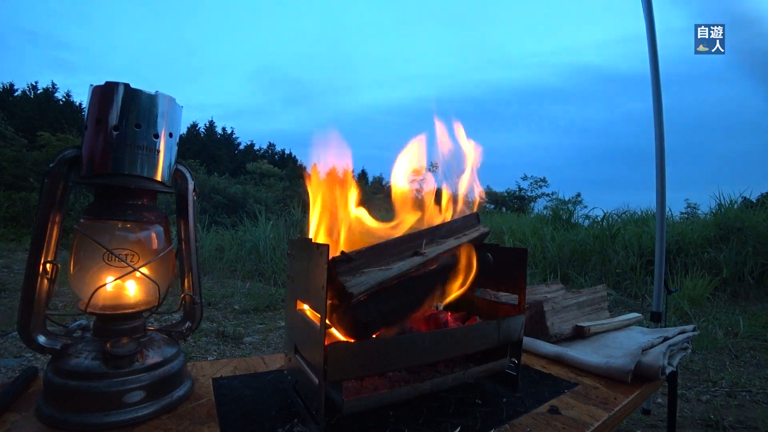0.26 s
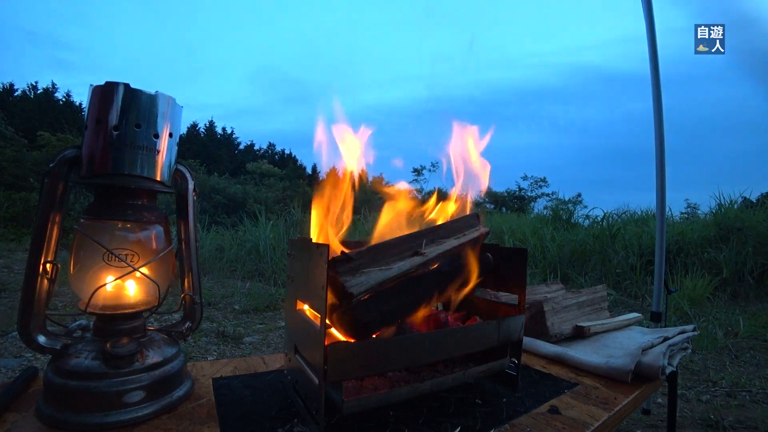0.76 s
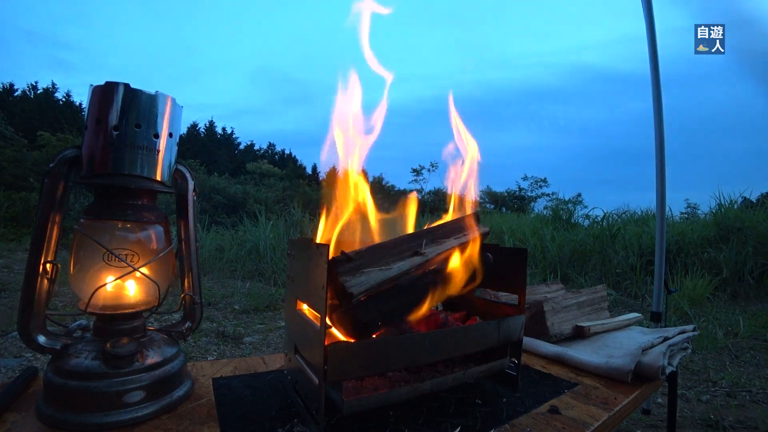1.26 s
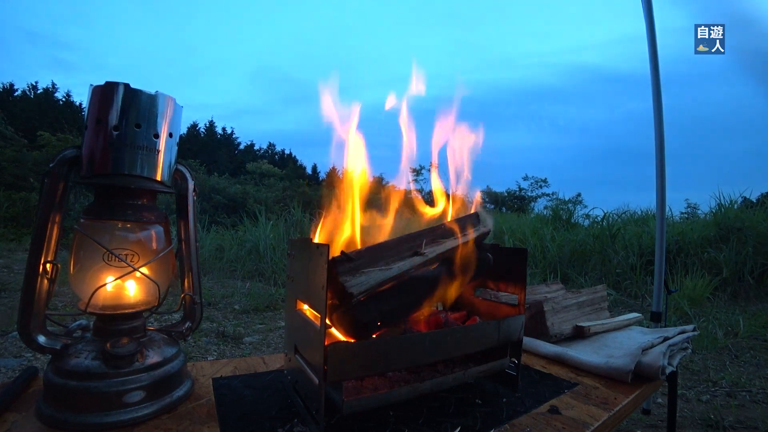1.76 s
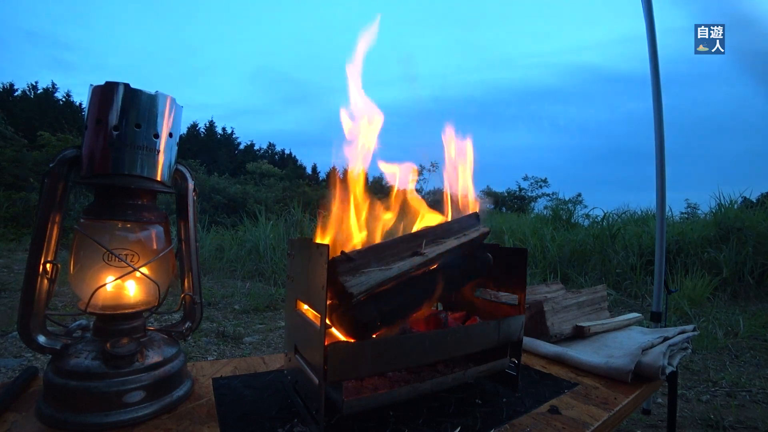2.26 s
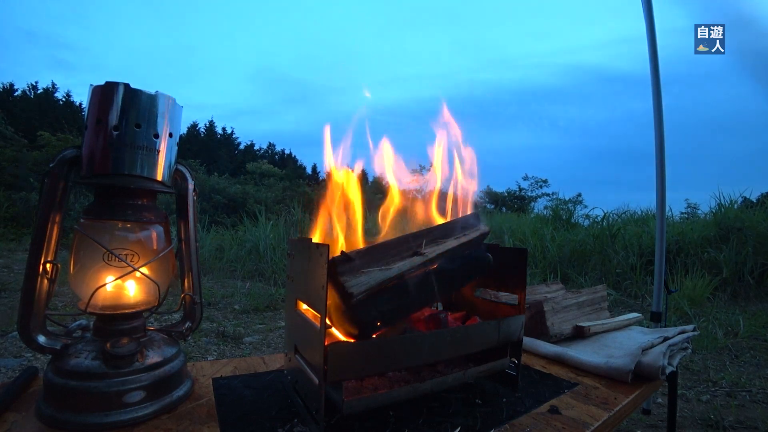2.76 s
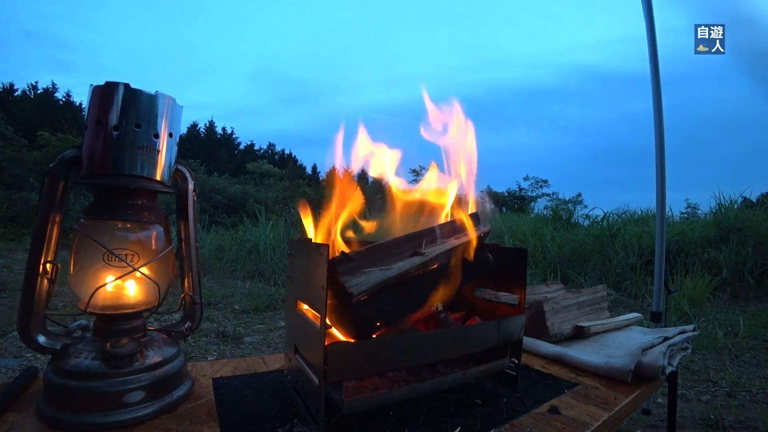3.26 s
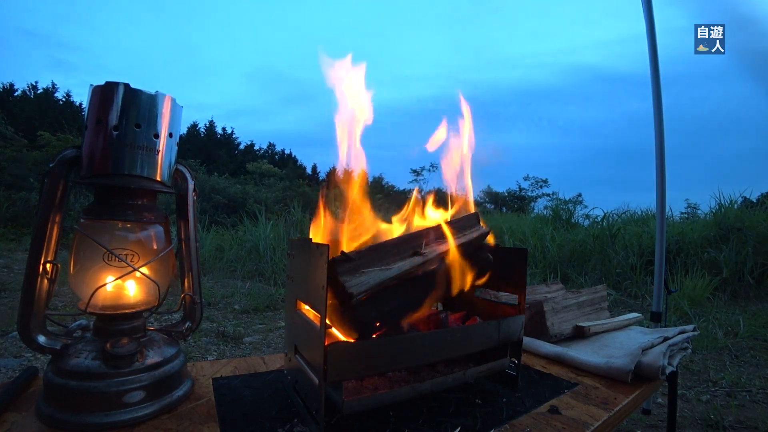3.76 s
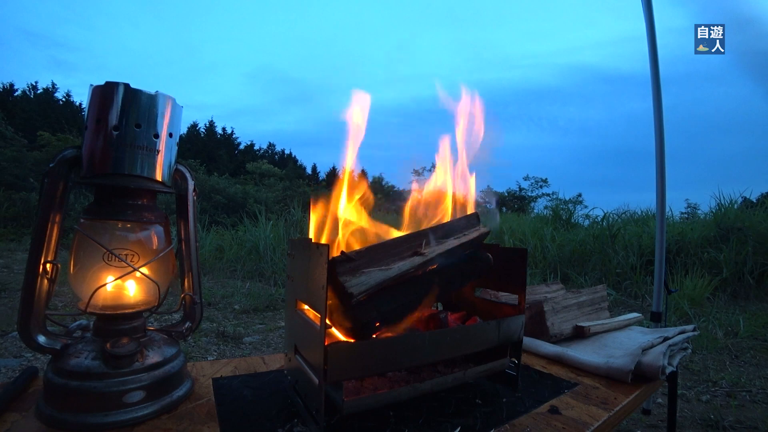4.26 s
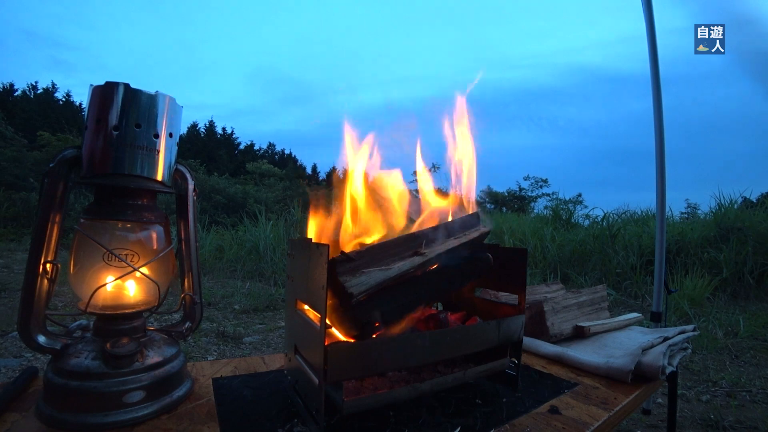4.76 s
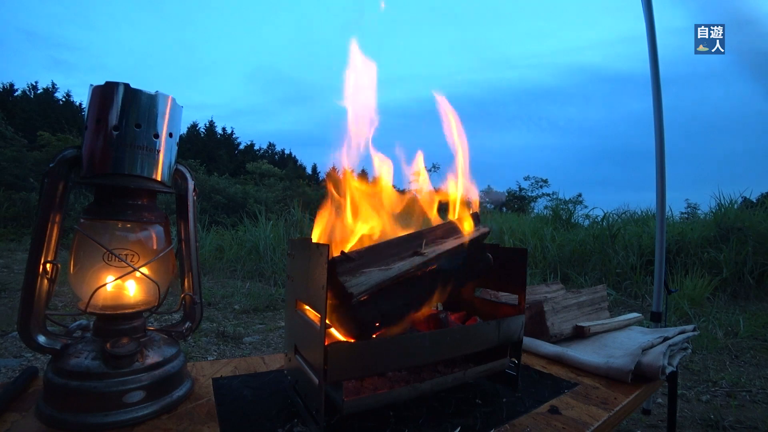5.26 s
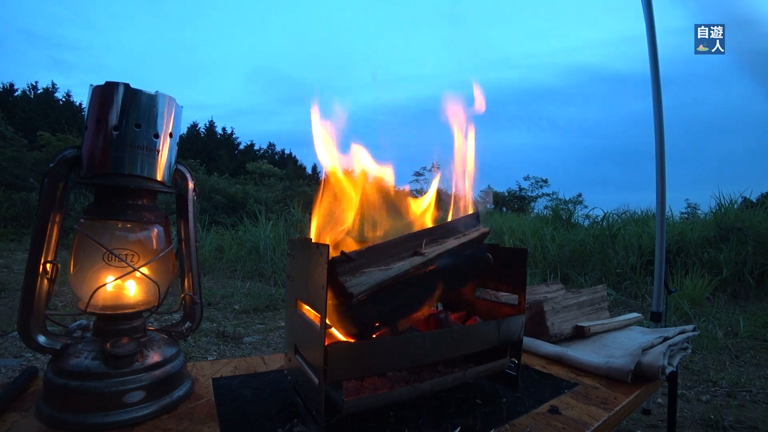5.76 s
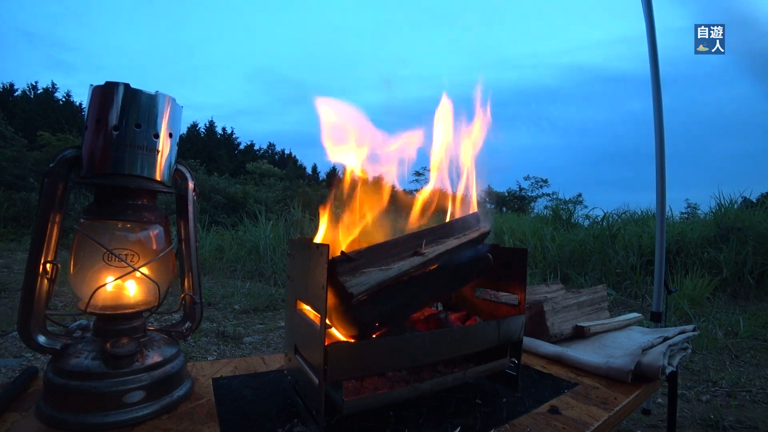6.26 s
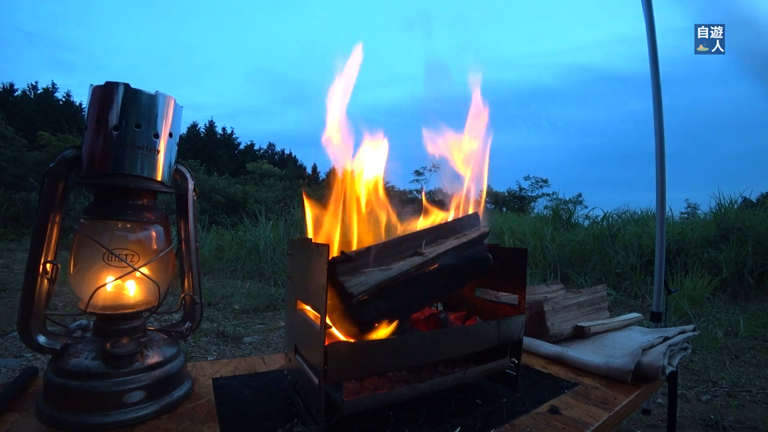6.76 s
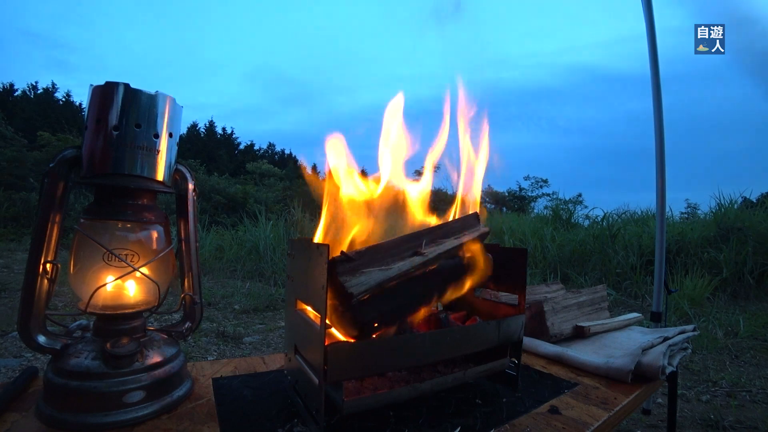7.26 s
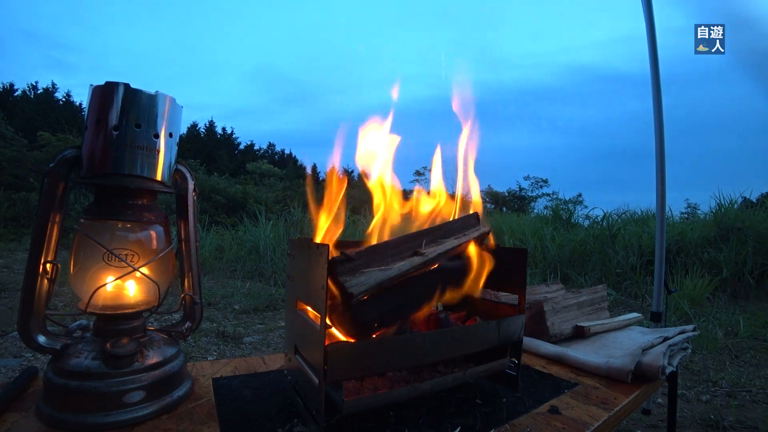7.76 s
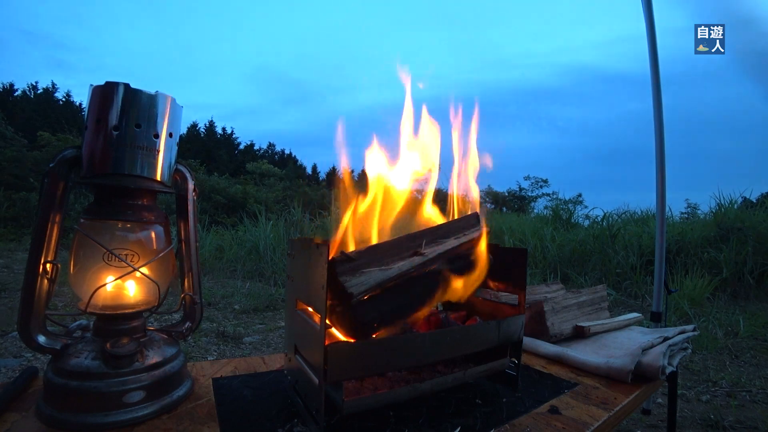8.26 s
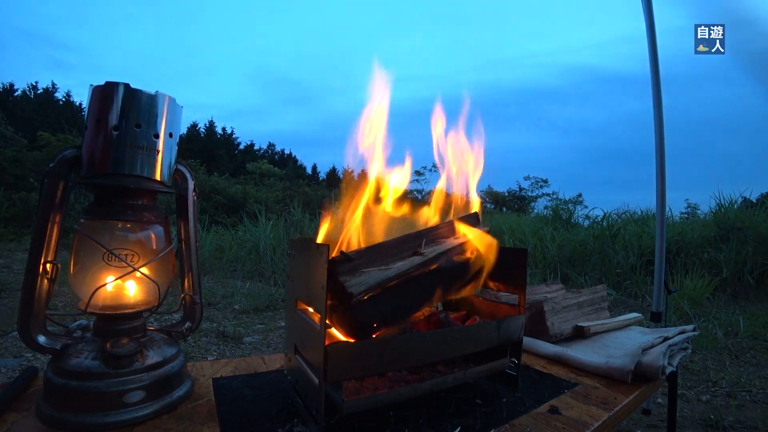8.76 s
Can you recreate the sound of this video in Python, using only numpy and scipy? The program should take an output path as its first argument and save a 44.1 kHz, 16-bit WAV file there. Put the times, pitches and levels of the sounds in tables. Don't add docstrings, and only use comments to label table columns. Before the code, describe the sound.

A small wood fire burns close to a wide stereo microphone outdoors at dusk. Soft, low flame puffs patter constantly, broken by dry, irregular snaps and a few sharp pops. Cicadas buzz in rapid pulses from the trees, gradually tiring; two new ones swell up near the end. Behind them lie a distant throbbing chorus, a thin high cricket, broad airy hiss and faint breeze rumble.

```python
import sys
import numpy as np
from scipy import signal
from scipy.fft import rfft, irfft
from scipy.io import wavfile

SR = 44100
rng = np.random.default_rng(int(sys.argv[2]) if len(sys.argv) > 2 else 0)


def invert_db(level):
    return 10 ** (np.asarray(level, dtype=float) / 20)


def materialize(psi):
    bounded = np.clip(np.atleast_2d(psi).T, -1, 1)
    quanta = np.round(bounded * 32767).astype(np.int16)
    wavfile.write(sys.argv[1], SR, quanta)


N = 396900
TIME = np.arange(N) / SR

# (time [s], level [dB])
SONG_A = [(0.1, -7), (.3, -4.5), (1.4, -4), (2.0, -3), (3.0, -1.5), (3.6, -3.5), (3.8, -5.5), (4.86, -4),
          (5.55, -6)]
SONG_B = [(0.2, 2), (.75, -1), (1.31, 1.2), (1.46, -5), (2.3, 1.5), (2.9, -5), (3.3, -2.5), (4.5, -13.5),
          (4.97, .5), (5.31, -5.5)]
SONG_C = [(0.1, -2), (.8, -5.5), (1.2, -2.5), (1.6, -4.5), (1.9, -6.5), (2.8, -4.5), (4.1, -4.5), (5.2, -6),
          (6.2, -4), (7.0, -6.5)]
SONG_D = [(6.9, -21), (7.19, -10.5), (7.34, -8.5), (7.63, -10.5), (7.79, -6.5), (7.93, -3), (8.68, 0.6),
          (8.99, 1)]
SONG_E = [(7.48, -5.5), (7.76, -6), (8.1, -2), (8.31, -2), (8.5, -1.5), (8.9, -1)]
# (time [s], rate [Hz])
RATE_A = [(0, 305.6), (2, 304), (3.2, 302.8), (4.3, 300.3), (5.5, 296)]
RATE_B = [(.2, 293), (1.3, 290.5), (2.8, 289), (5.5, 287.4)]
RATE_C = [(0, 282.3), (1, 281), (3.5, 281), (5, 279.3), (7, 276.2)]
RATE_D = [(6.9, 289.4), (7.2, 291), (7.35, 296), (7.78, 298.6), (8.07, 301.3), (8.22, 303.4), (9, 303.4)]
RATE_E = [(7.48, 296.5), (7.85, 298.3), (8.2, 297.4), (8.9, 296.3)]
# (syllables sung so far [count], time [s])
PACE_A = [(0, -.016), (26, 3.905), (30, 4.528), (32, 4.862), (36, 5.552)]
PACE_B = [(0, -.008), (4, .566), (10, 1.455), (20, 2.957), (26, 3.886), (30, 4.495), (35, 5.305)]
PACE_C = [(0, .012), (19, 3.03), (31, 4.97), (43, 6.985)]
PACE_D = [(0, 6.903), (3, 7.338), (9, 8.222), (12, 8.675), (14, 8.986)]
PACE_E = [(0, 7.478), (6, 8.312), (10, 8.895)]


def curve(rows):
    return np.interp(TIME, *np.transpose(rows))


def coloured(gain):
    hz = np.arange(N // 2 + 1) * SR / N
    spectrum = rfft(rng.standard_normal(N)) * gain(hz + 1e-3)
    return irfft(spectrum, N) * np.sqrt(SR / 2)


def hiss(spectrum_rows):
    hz, db = np.transpose(spectrum_rows)
    return coloured(lambda f: invert_db(np.interp(np.log(f), np.log(hz), db)))


def hump(hz, width_hz):
    x = coloured(lambda f: np.exp(-((f - hz) / width_hz) ** 2))
    return x / x.std()


def walk(rate_hz, t=TIME):
    return 1.2 * np.interp(t * rate_hz, np.arange(1000), rng.standard_normal(1000))


def add(out, start_s, grain):
    i = int(start_s * SR)
    out[..., i:i + grain.shape[-1]] += grain[..., :max(N - i, 0)]


def puffs():
    # (time [s], pitch [Hz], peak [dB])
    clear_pockets = [(.0544, 650, -36), (.5146, 630, -43), (.6058, 630, -43), (1.4251, 500, -40),
                     (1.9793, 484, -41), (2.6292, 650, -35), (2.9399, 497, -41.5), (2.9891, 630, -40),
                     (3.0727, 633, -39), (3.1832, 650, -35.5), (3.2043, 685, -35.5), (3.2803, 500, -38.5),
                     (3.6167, 510, -42), (3.9101, 630, -43), (4.326, 670, -37.5), (4.4198, 506, -41),
                     (5.0336, 630, -40), (5.1531, 500, -39.5), (5.1912, 503, -40), (5.4621, 500, -39),
                     (5.5955, 500, -37.5), (6.3395, 500, -39.5), (6.5065, 500, -39), (6.9562, 630, -35),
                     (7.1465, 530, -36.5), (7.3987, 510, -38), (8.6024, 500, -40), (8.7223, 495, -39),
                     (8.7991, 630, -40), (8.9804, 500, -39)]
    # (time [s], pitch [Hz], peak [dB])
    deep_pockets = [(.1595, 250, -45), (.3076, 397, -42.5), (.578, 324, -40), (.7624, 450, -43.5),
                    (1.5861, 404, -40.5), (1.9245, 332, -39.5), (2.1978, 396, -40.5), (2.2773, 410, -38),
                    (2.2946, 327, -43), (2.4492, 320, -41.5), (2.4866, 247, -42), (2.8496, 397, -41),
                    (3.4495, 320, -46), (3.8611, 400, -43), (4.1403, 313, -44), (4.442, 316, -41),
                    (4.5194, 390, -35), (4.7109, 250, -44), (4.9098, 410, -42.5), (5.579, 400, -42),
                    (5.9713, 400, -46), (6.0493, 252, -42.5), (6.3587, 400, -42), (6.7806, 320, -43.5),
                    (6.9687, 388, -37.5), (6.9747, 400, -39.5), (7.1789, 312, -40), (8.5332, 258, -37.5),
                    (8.6407, 450, -46), (8.9649, 420, -42)]
    # (time [s], peak [dB])
    soft_pockets = [(.0828, -44), (.6978, -45), (1.3746, -47), (1.7261, -45), (1.7722, -42), (1.8679, -45),
                    (2.2347, -44), (2.5182, -43.5), (2.6354, -45), (3.0785, -42), (3.1489, -44),
                    (3.2657, -44), (3.3776, -43), (3.5564, -47), (3.7548, -45), (4.8042, -43), (4.954, -43),
                    (5.063, -43), (5.4682, -41), (5.6804, -43.5), (5.737, -46), (6.316, -43),
                    (6.8871, -41.5), (8.253, -46.5), (8.2822, -49), (8.4735, -47), (8.521, -43),
                    (8.5398, -45), (8.5937, -40.5), (8.7299, -41)]
    # (time [s], level of the weak patter [dB])
    flame_level = [(0, 0), (1.0, -0.5), (1.3, -0.5), (2.5, 0.5), (4.1, -0.5), (5.2, 1.5), (6.6, -1.5),
                   (7.3, -1.5), (7.5, -5.5), (8.15, -1.5), (8.5, 2), (9, 4.5)]

    chance = rng.random((1200, 3))
    start_s = np.repeat(rng.random(600), 2) * (N / SR - .05) + .03 * chance[:, 0]
    pitch_hz = 260 * 2 ** (1.78 * chance[:, 1])
    peak_db = np.minimum(-59.5 - 4.46 * np.log(chance[:, 2]), -46.5)
    peak_db = peak_db + np.interp(start_s, *np.transpose(flame_level))
    weak = np.column_stack([start_s, pitch_hz, peak_db])
    soft = np.insert(soft_pockets, 1, 478, axis=1)

    out, t = np.zeros(N), np.arange(-200, 200) / SR
    for s, hz, db in np.vstack([clear_pockets, deep_pockets, soft, weak]):
        u = 2 * np.pi * 0.91 * hz * t
        push = u * np.exp(.5 - .1 * u - u ** 2 / 2)
        suck = .65 * np.exp(-6 * abs(u + .8))
        add(out, max(s + t[0], 0), invert_db(db) * (push - suck))
    out = signal.sosfiltfilt(signal.butter(2, 180, "highpass", fs=SR, output="sos"), out)
    out = out + invert_db(-11.5) * signal.lfilter(*signal.iirpeak(390, 2.5, fs=SR), out)
    return np.array([invert_db(1.8) * out, invert_db(3.2) * out])


def snaps():
    # (time [s], peak [dB], brightness [dB], wooden knock [dB])
    clear_snaps = [(.0518, -30, 7, 0.5), (.1994, -26.5, 8, -9), (.2778, -22, 3, -20), (1.724, -34, -7, -21),
                   (7.725, -37, -9, -1), (2.3276, -26, 6, -19), (2.5716, -26.5, 7, -10),
                   (2.6853, -27, 7, -20), (2.7771, -29, 5, -16), (2.8554, -23.5, -1, -3.5),
                   (3.6351, -30.5, 9, -20), (4.0163, -16.5, 7, -24), (4.0851, -22, 5, -30),
                   (4.138, -26, 9, -21), (4.2173, -23, 8, -26), (4.4732, -31, 2, -7),
                   (4.4922, -23.5, 7, -22), (5.5194, -28.5, 12, -16), (5.6042, -31, 10, -7),
                   (6.3375, -32.5, 2, -0.5), (6.4194, -34.5, 0, -1), (6.8374, -20, 13, -29),
                   (6.9516, -35.5, 3, 1), (7.1217, -23.5, 2.5, -27), (7.2105, -28.5, 2, -22),
                   (7.145, -40, -4, 3), (7.4649, -33, -3, -22), (7.5517, -29, 6, -19),
                   (7.8416, -19, 17, -23), (8.4991, -29, -1, -8)]

    chance = rng.random((260, 4))
    peak_db = np.minimum(-46 - 4 * np.log(chance[:, 1]), -37)
    weak = np.column_stack([chance[:, 0] * N / SR, peak_db, 12 * chance[:, 2], -20 + 10 * chance[:, 3]])
    rows, t = np.vstack([clear_snaps, weak]), np.arange(300) / SR

    burst = invert_db(-21) * rng.standard_normal((len(rows), 2, len(t))) * np.exp(-t / 0.001)
    burst[:, 1] = .9 * burst[:, 0] + .4 * burst[:, 1]
    burst[:, :, 0] = 1
    bands = []
    for band_hz in ((1300, 2230), (4600, 5930), (6300, 9100)):
        band = signal.sosfilt(signal.butter(2, band_hz, "bandpass", fs=SR, output="sos"), burst)
        bands.append(band / abs(band).max(axis=(1, 2), keepdims=True))
    knock, mid, top = bands

    out = np.zeros((2, N))
    for k, (s, db, bright_db, knock_db) in enumerate(rows):
        crack = invert_db(-bright_db / 2) * mid[k] + invert_db(bright_db / 2) * top[k]
        crack = crack / abs(crack).max()
        add(out, s + .001, invert_db(db) * (crack + invert_db(knock_db) * knock[k]))
    return out


def syllables(pace, effort):
    sung, at_s = np.transpose(pace)
    s = np.interp(np.arange(sung[-1] + 1), sung, at_s)
    scatter_db = 0.45 * rng.standard_normal(len(s))
    return s, np.interp(s, *np.transpose(effort)) + scatter_db


def cicada(grit, buzz, pace, uneven_db, effort, rate, rib_db, drift_db, pan_db, length_s, rasp_db, echo_db):
    side_steps = (-1, 1, 2)
    side_levels = [(-18.5, -15.5, -4.5, -0.5), (-57, -19, -20, -36), (-22.5, -24, -21, -35)]
    growth_db = (0.5, 2, -1, -6.5)

    s, syllable_db = syllables(pace, effort)
    span = slice(max(int((s[0] - .2) * SR), 0), int((s[-1] + .3) * SR))
    t = TIME[span]
    nearest = np.searchsorted((s[1:] + s[:-1]) / 2, t)
    db = syllable_db[nearest]

    u = (t - s[nearest]) / (length_s * np.clip(1 + 0.034 * db, .4, 1.2) / 2)
    within = np.clip(u, -1, 1)
    gate = np.exp(-np.abs(u) ** 3)
    rasp = invert_db(rasp_db - 0.45 * db) * grit[span]

    hz = curve(rate)[span] * (1 + .002 * within + .0008 * walk(50, t))
    phase = 2 * np.pi * np.cumsum(hz) / SR

    voice = invert_db(rib_db[1] - 14.0 - 0.27 * db) * buzz[span]
    echo = voice * np.ones((2, 1))
    for k in range(4):
        order = 7 * (k + 1)
        lines = (1 + rasp) * np.sin(order * phase + k)
        for step, levels in zip(side_steps, side_levels):
            side_db = uneven_db * (k < 3) + levels[k] - 0.1 * db
            lines += invert_db(side_db) * np.sin((order + step) * phase + step)
        if k == 1:
            lines *= invert_db(drift_db * (t - s.mean()))
        voice = voice + lines * invert_db(rib_db[k] + growth_db[k] * within + 0.86 * walk(15, t))
        echo = echo + lines * invert_db(rib_db[k]) * np.array([walk(28, t), walk(28, t)])

    swell = gate * invert_db(db + 4.5)
    voice = voice * swell
    decay = np.exp(-1 / (.05 * SR))
    echo = echo * np.sqrt(signal.lfilter([1 - decay], [1, -decay], swell ** 2))
    direct = np.array([voice * invert_db(pan_db / 2), np.roll(voice, 1) * invert_db(-pan_db / 2)])
    out = np.zeros((2, N))
    out[:, span] = direct + invert_db(echo_db) * echo
    return out


def cicadas():
    # (effort, buckling rate, four overtones [dB], drift of the second [dB/s],
    # left minus right [dB], syllable length [s], rasp [dB], echo [dB])
    singers = [
        (SONG_A, RATE_A, (-60, -56, -53.5, -51.5), -3.3, 2.2, 0.075, -8, -2.9),
        (SONG_B, RATE_B, (-58, -49.5, -61, -67), 0.11, -3.7, 0.053, -7, -6),
        (SONG_C, RATE_C, (-55, -54, -63, -60), -0.73, -3.5, 0.065, -7.5, -0.84),
        (SONG_D, RATE_D, (-38.5, -40.5, -48.5, -54.5), -5, 3.7, 0.062, -8.5, -3.5),
        (SONG_E, RATE_E, (-41, -39.5, -44, -52), .1, 1.7, 0.069, -7.5, -1),
    ]
    # (pace, uneven rib clicks [dB on side lines])
    paces = [
        (PACE_A, -1.6),
        (PACE_B, 1),
        (PACE_C, 9.2),
        (PACE_D, 0.1),
        (PACE_E, 0.1),
    ]

    grit, buzz = hump(0, 314), hump(5370, 1930)
    lags = rng.integers(N, size=5)
    return sum(cicada(np.roll(grit, lag), np.roll(buzz, lag), *pace, *singer)
               for lag, pace, singer in zip(lags, paces, singers))


def chorus():
    # (centre [Hz], width [Hz])
    chorus_bands = [(2040, 200), (4050, 240), (6180, 300), (8200, 450)]
    chorus_db = (-57, -56, -61, -58)
    # (time [s], level [dB])
    chorus_swell = [(0, 0), (2, 0), (4, -2), (5.5, -4), (6.8, -6), (9, -5)]

    throb = invert_db(curve(chorus_swell) + 1.0 * hump(6.8, 3))
    out = np.zeros((2, N))
    for (hz, width_hz), db in zip(chorus_bands, chorus_db):
        sides = 0.74 * hump(hz, width_hz) * np.array([[1], [-1]])
        out += invert_db(db) * (hump(hz, width_hz) + sides)
    return throb * out


def cricket():
    chop = np.exp(1.5 * np.cos(2 * np.pi * 30.0 * TIME))
    tone = np.sin(2 * np.pi * 9920 * TIME + .8 * walk(8))
    return invert_db(-69 + walk(2)) * chop * tone * invert_db(np.array([[2.5], [-2.5]]))


def air():
    # (frequency [Hz], density [dB per Hz])
    ahead_hiss = [(20, -125), (70, -98), (130, -93), (300, -91), (500, -88.5), (1000, -87.5), (1600, -88.5),
                  (3000, -90.5), (4800, -90.5), (7300, -86), (9000, -95.5), (10300, -87), (11000, -95)]
    # (frequency [Hz], density [dB per Hz])
    side_hiss = [(20, -125), (100, -105), (250, -92.5), (500, -83), (900, -79.5), (1600, -82), (3000, -89),
                 (5000, -94.5), (7500, -97.5), (9000, -99), (11000, -102)]
    # (time [s], level [dB])
    breeze_level = [
        (0, -62.5),
        (2, -62),
        (4, -61),
        (4.7, -65),
        (4.95, -78),
        (5.1, -90),
        (6.05, -92),
        (6.4, -64.5),
        (9, -59.5),
    ]

    stir = invert_db(.5 * walk(5))
    ahead = stir * hiss(ahead_hiss) + invert_db(curve(breeze_level)) * hump(50.5, 55.4)
    around = invert_db(.4 * walk(2.98)) * hiss(side_hiss)
    return np.array([ahead + around, ahead - around])


def scene():
    return puffs() + snaps() + cicadas() + chorus() + cricket() + air()


def band_limit(x):
    return signal.sosfilt(signal.butter(12, 12150, fs=SR, output="sos"), x)


def record(dry):
    low_pass = signal.ellip(10, .3, 50, 11050, fs=SR, output="sos")
    return band_limit(signal.sosfilt(low_pass, dry))


dry = scene()
out = record(dry)
materialize(out)
```